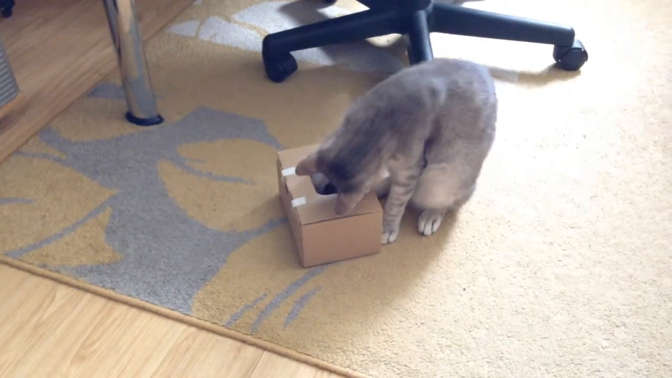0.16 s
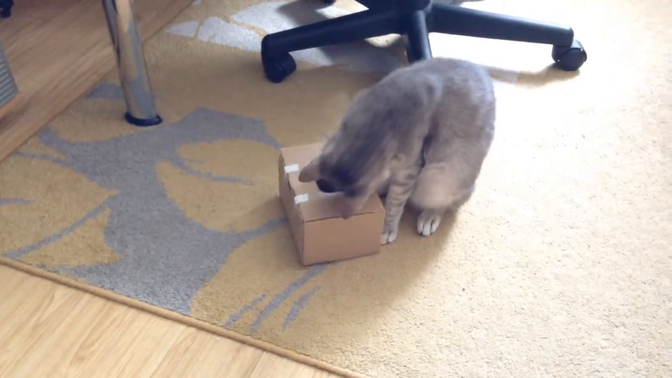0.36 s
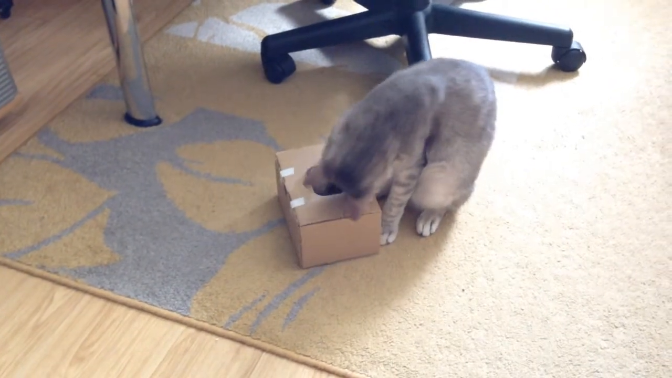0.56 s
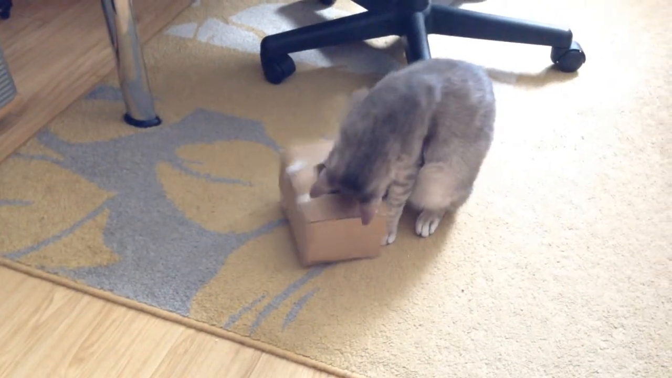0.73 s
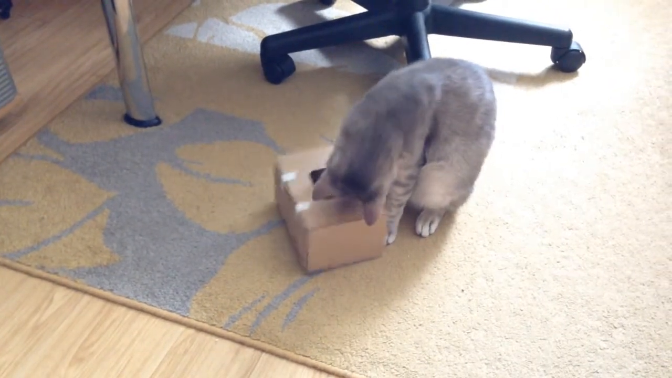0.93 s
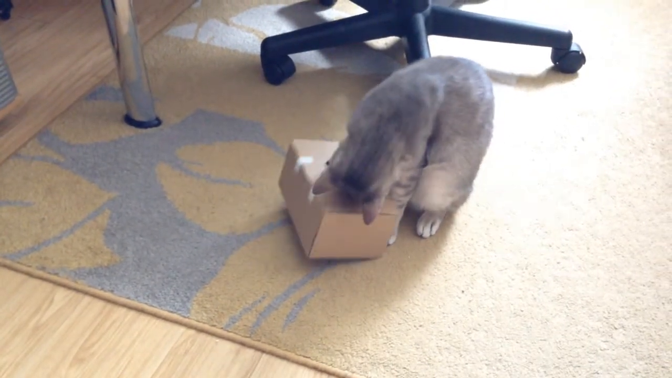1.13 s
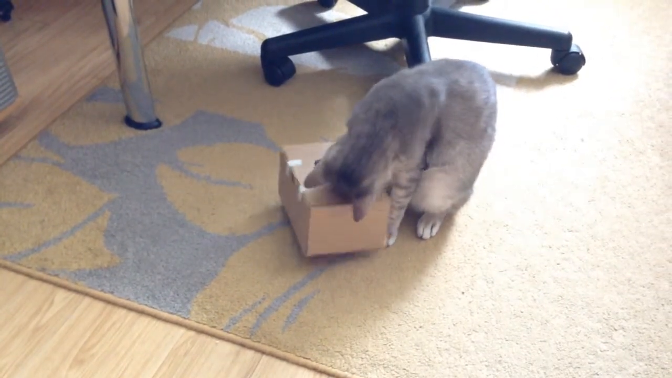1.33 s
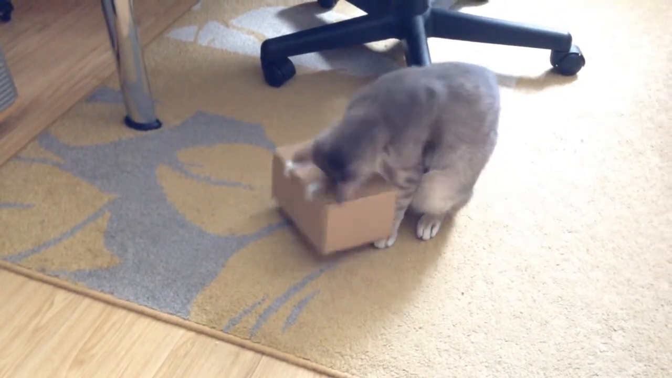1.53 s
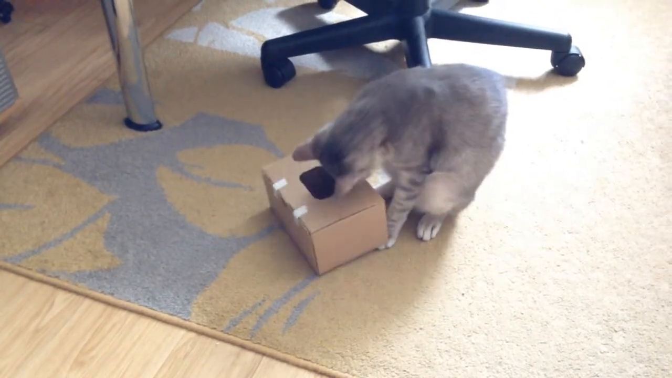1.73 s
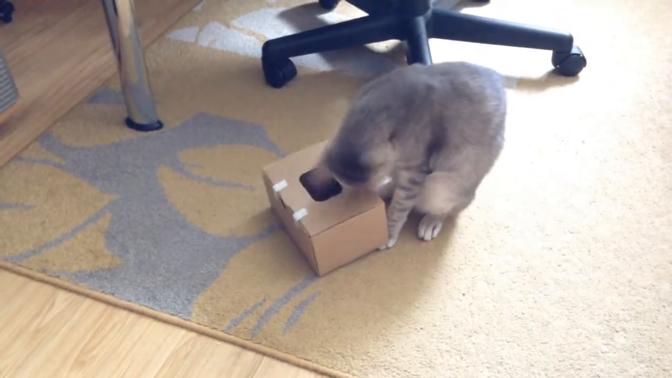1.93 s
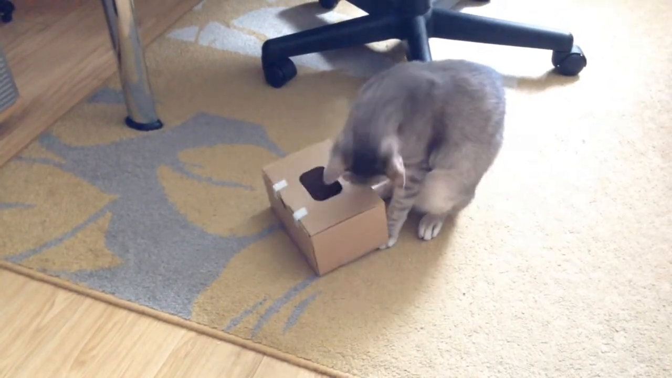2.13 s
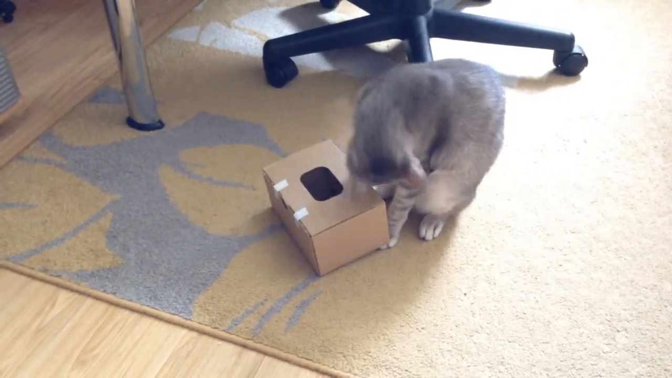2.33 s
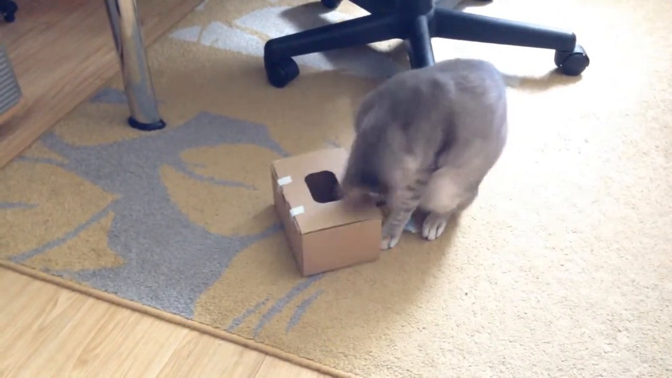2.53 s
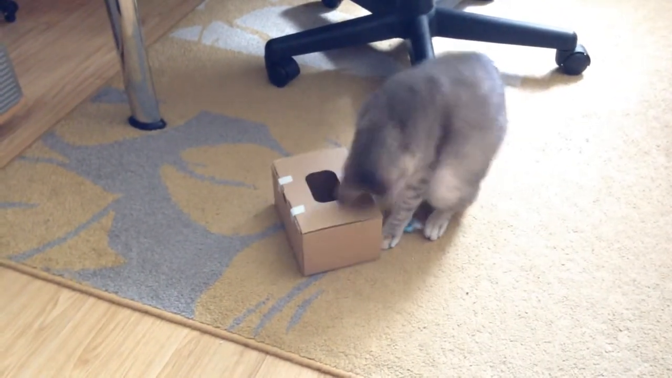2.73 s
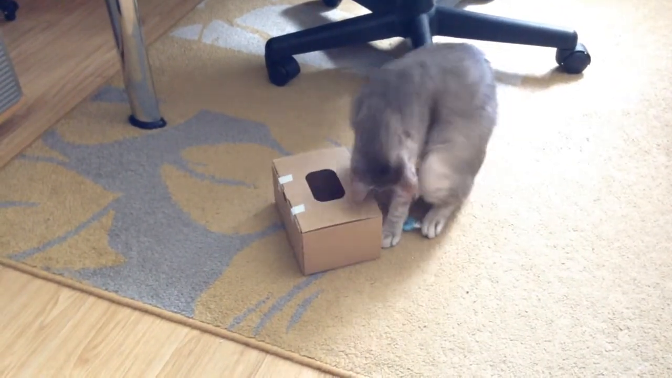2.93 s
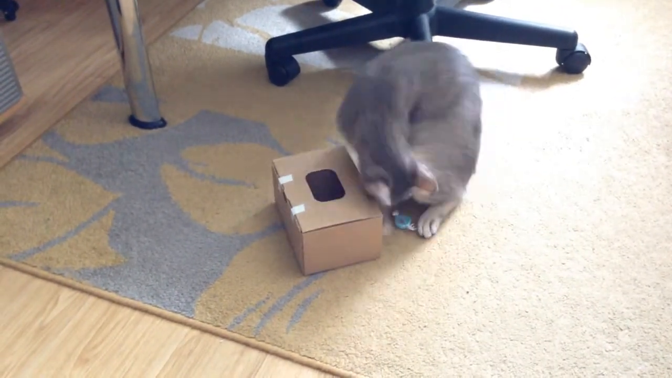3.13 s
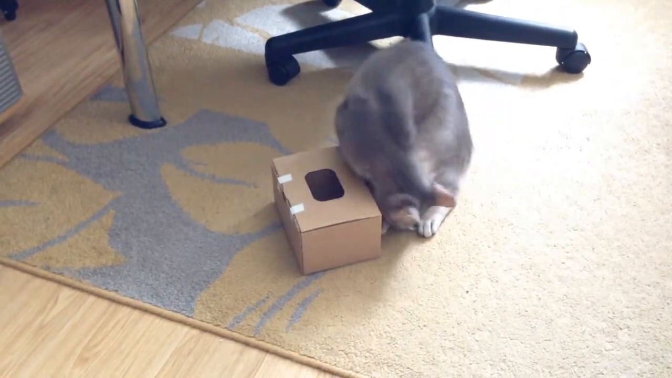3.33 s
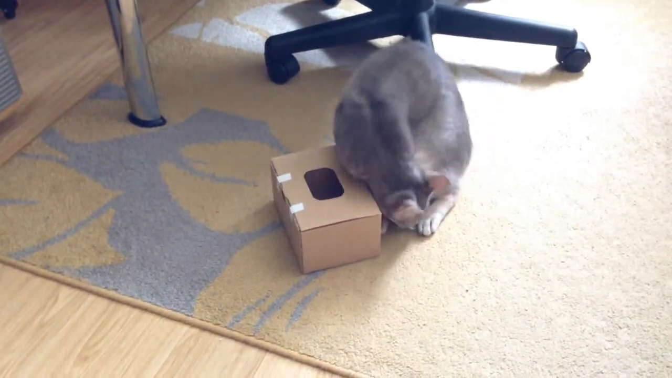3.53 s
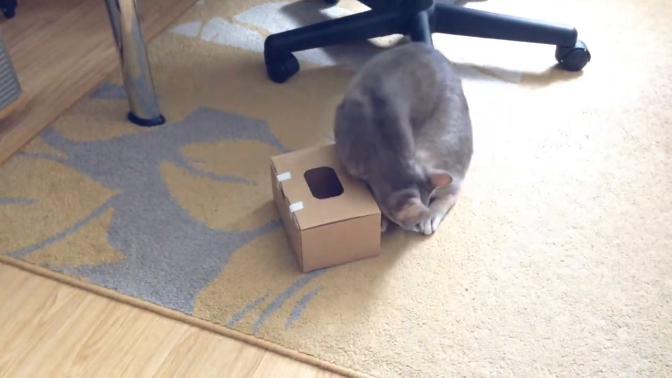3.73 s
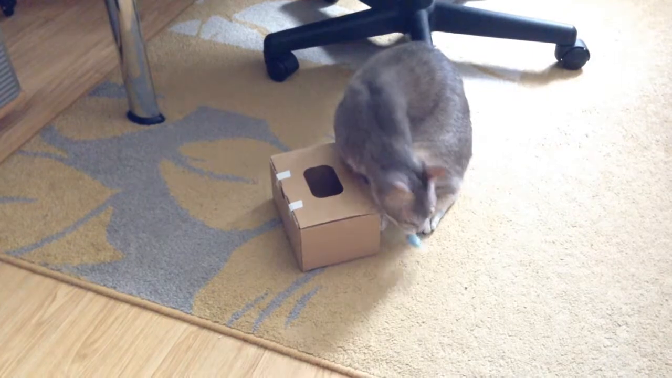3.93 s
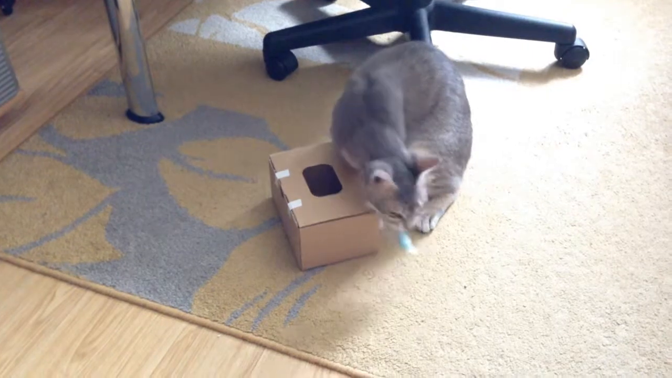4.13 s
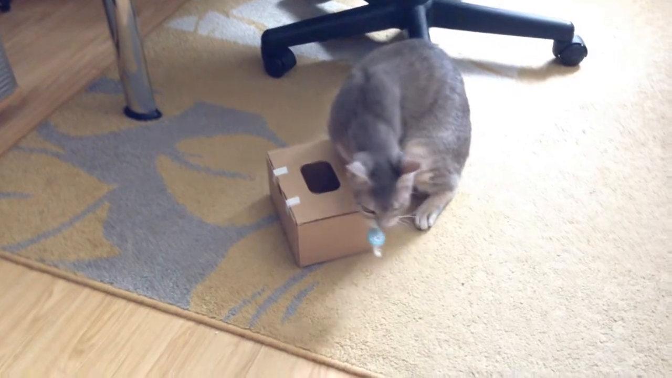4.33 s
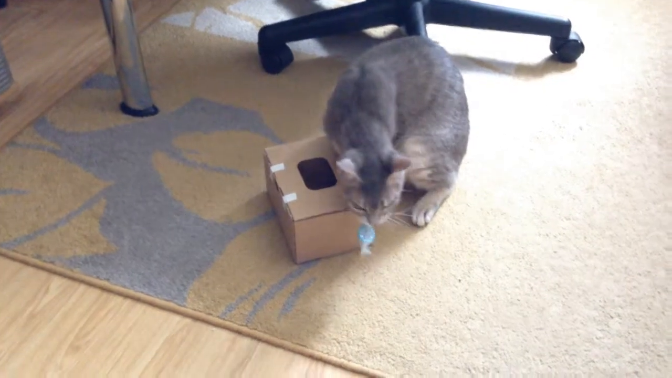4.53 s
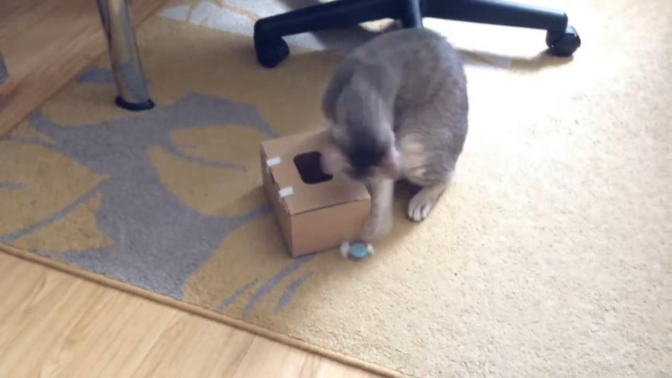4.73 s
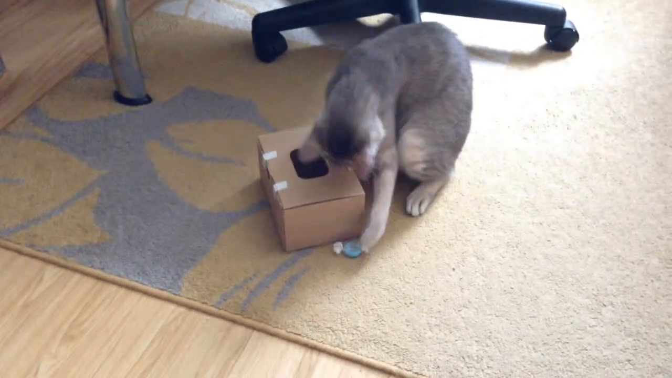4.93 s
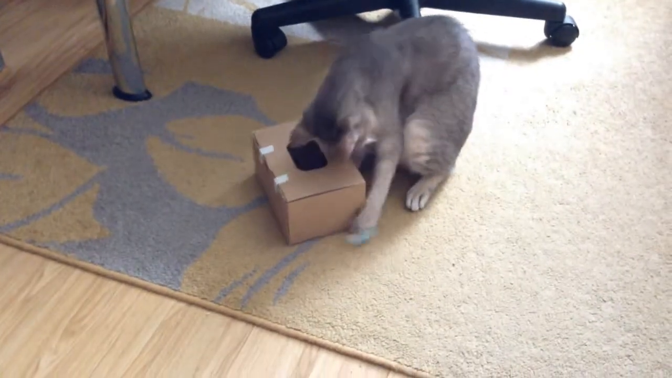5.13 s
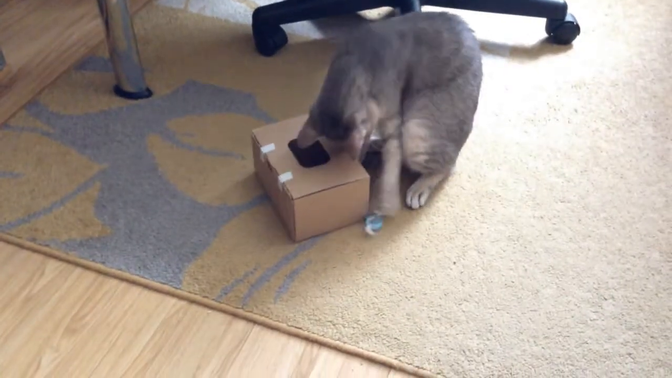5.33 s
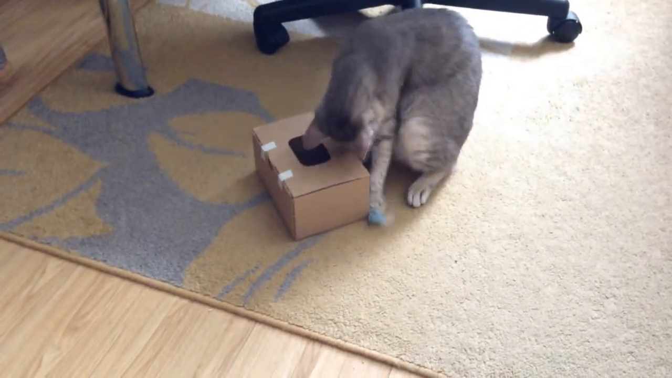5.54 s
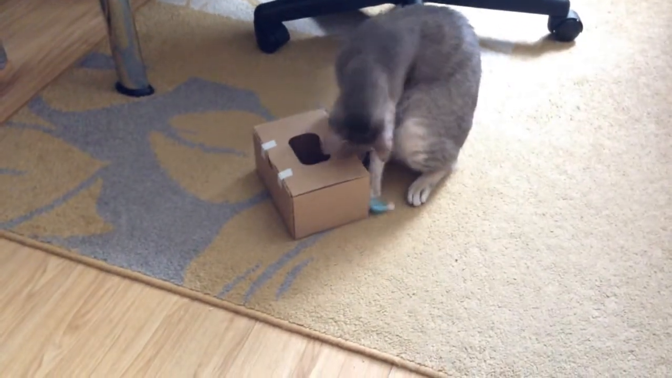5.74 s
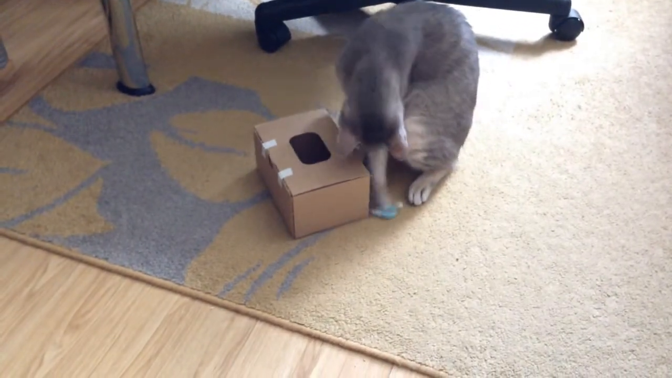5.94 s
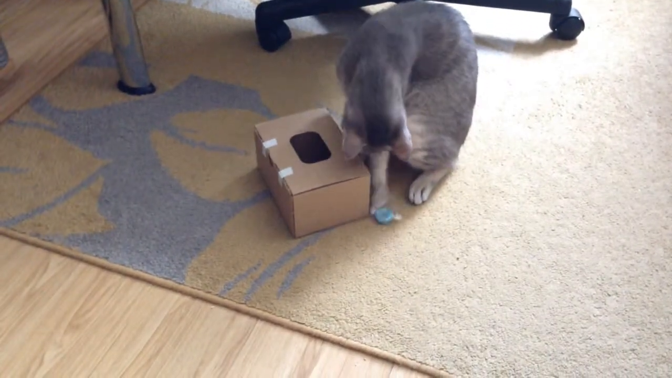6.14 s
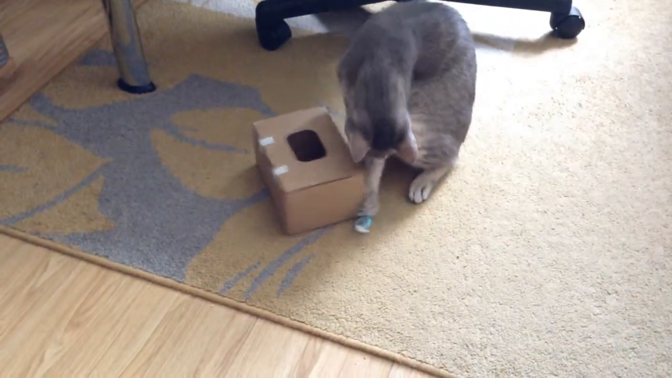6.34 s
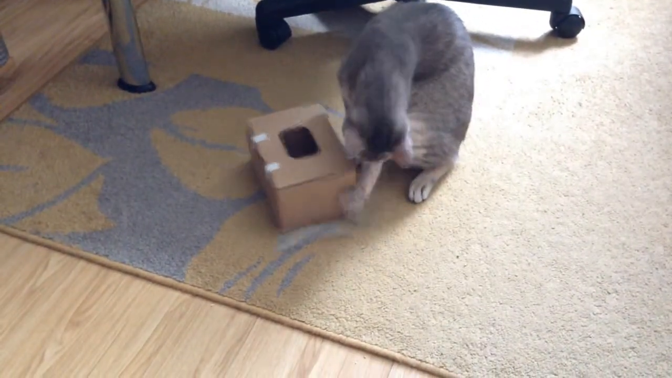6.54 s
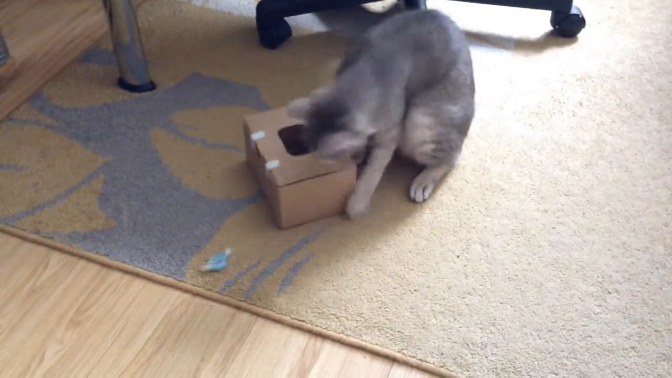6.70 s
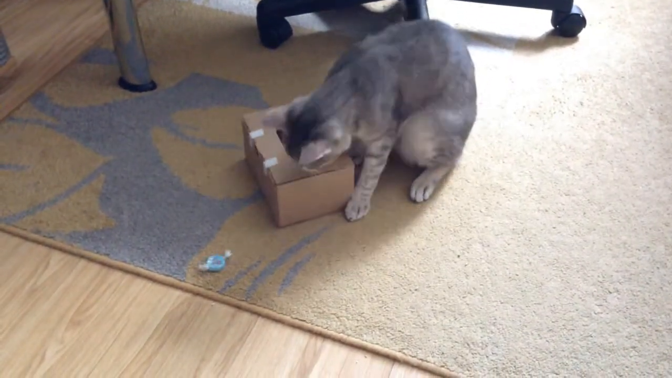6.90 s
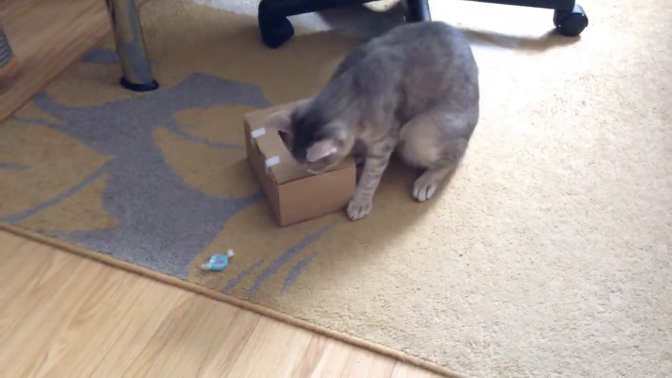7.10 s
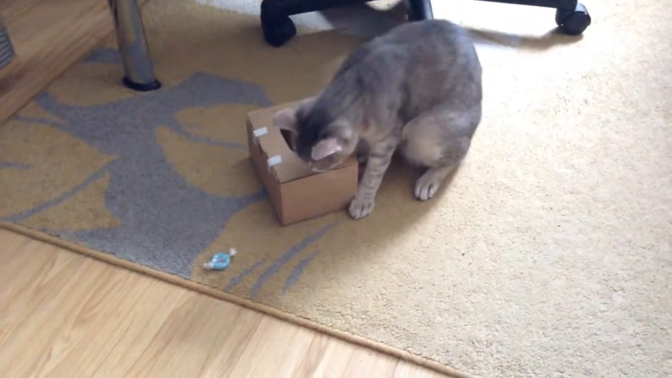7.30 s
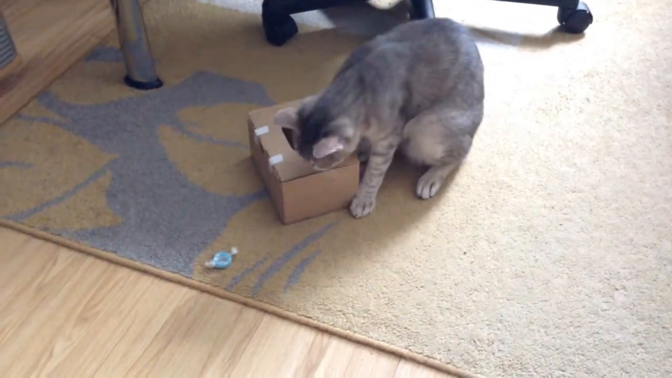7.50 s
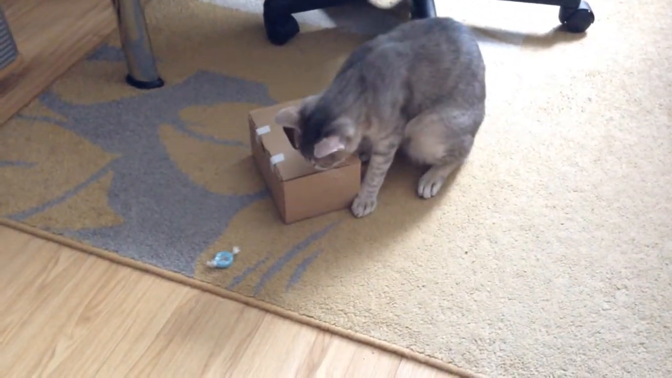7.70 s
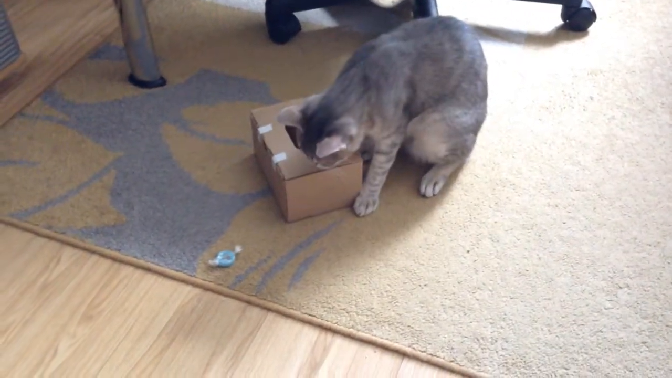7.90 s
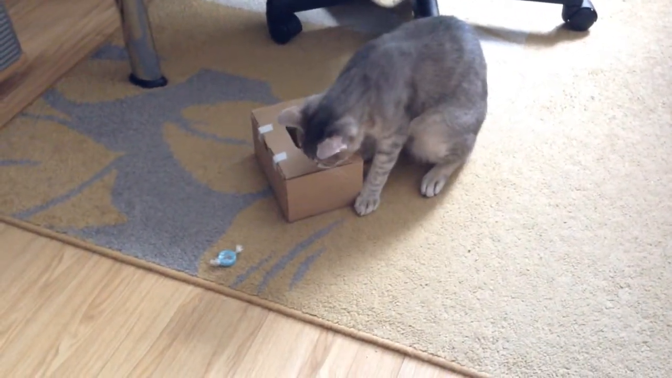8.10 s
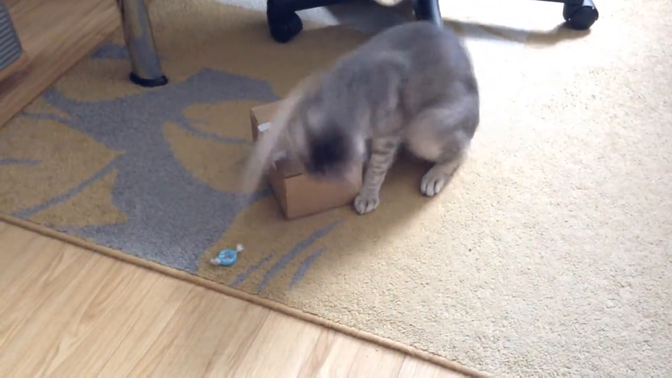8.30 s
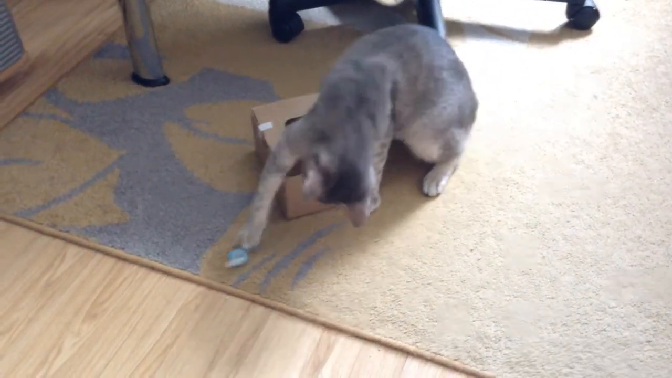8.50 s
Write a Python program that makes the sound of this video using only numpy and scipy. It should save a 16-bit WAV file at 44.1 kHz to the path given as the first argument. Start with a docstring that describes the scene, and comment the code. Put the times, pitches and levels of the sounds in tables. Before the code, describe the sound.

Cardboard knocks, slides and rasps under a cat's claws, followed by faint ticks and crinkles of a plastic wrapper in a quiet room.

```python
"""A faint fan hums in a small furnished room; the action is a metre or so away.
First a cat digs in a small cardboard box on a carpet: the box slides, knocks hollow and rocks,
claws rasp on its walls and paws thud softly. After two seconds the digging thins out.
Then the cat bats a wrapped sweet about: the film ticks and crinkles, claws catch, the sweet
bounces over the carpet, and after a pause one last swipe snaps the wrapper."""
import sys
import numpy as np
from scipy import signal
from scipy.fft import rfft, irfft, next_fast_len
from scipy.io import wavfile

SR = 44100
rng = np.random.default_rng(int(sys.argv[2]) if len(sys.argv) > 2 else 0)


def store_wav(level_fs):
    """Save 16-bit WAV to argv[1]."""
    pcm = np.round(np.clip(np.atleast_2d(level_fs), -1, 1) * 32767)
    wavfile.write(sys.argv[1], SR, pcm.T.astype(np.int16))


N = 381906
TIME = np.arange(N) / SR


def undb(db):
    """Decibels to gain."""
    return 10 ** (np.asarray(db) / 20)


def level(x, db):
    """Scale to an rms level."""
    return x * undb(db) / np.sqrt(np.mean(x ** 2) + 1e-20)


def peak(x, db):
    """Scale to a peak level."""
    return x * undb(db) / np.abs(x).max()


def add(track, s, sound):
    """Mix a sound into a track at s seconds."""
    i = max(int(s * SR), 0)
    track[i:i + len(sound)] += sound[:max(N - i, 0)]


def band(x, hz, width_hz):
    """Two-pole resonance with gain 1 at its centre."""
    damping = width_hz / hz
    warped_rate = .5 / np.tan(np.pi * hz / SR)
    return signal.lfilter(*signal.bilinear([damping, 0], [1, damping, 1], warped_rate), x)


def cut(x, hz, kind, order=2):
    """Low-pass or high-pass."""
    return signal.sosfilt(signal.butter(order, hz, kind, fs=SR, output="sos"), x)


def colour(x, points):
    """EQ a sound through (f/Hz, level/dB) points; rms 1."""
    hz, db = np.transpose(points)
    size = next_fast_len(len(x))
    f = np.maximum(np.fft.rfftfreq(size, 1 / SR), 1)
    eq = undb(np.interp(np.log(f), np.log(hz), db))
    return level(irfft(rfft(x, size) * eq, size)[:len(x)], 0)


def wander(hz):
    """Smooth random modulation below hz; rms 1."""
    return level(cut(rng.standard_normal(N), hz, "low"), 0)


def slips(per_s, spread_db, grip_db=2.5):
    """Stick-slip grains of uneven size; they bunch as the grip tightens and lets go."""
    grip = undb(grip_db * wander(hz=55))
    hit = rng.random(N) < grip * per_s / SR
    polarity = np.sign(rng.standard_normal(N))
    size = undb(spread_db * np.minimum(rng.exponential(size=N), 4))
    return hit * np.sqrt(grip) * polarity * size


def stroke(grains, s, length, bite_s, release_share=0.48):
    """The grains of one stroke: it bites quickly and eases off, with time to ring after."""
    start, n = int(s * SR), int(length * SR)
    t = TIME[:n]
    pressure = (1 - np.exp(-t / bite_s)) * np.minimum((1 - t / (n / SR)) / release_share, 1)
    pressed = np.take(grains, np.arange(start, start + n), mode="wrap") * pressure
    return np.pad(pressed, (0, SR // 100))


def room(x, wet_db, t60, build_s=0.0008):
    """Direct sound plus a short diffuse tail from walls and furniture."""
    t = TIME[:SR // 2]
    build_up = 1 - np.exp(-(t / build_s) ** 2)
    tail = rng.standard_normal(len(t)) * undb(-60 * t / t60) * build_up
    tail = cut(tail / np.sqrt(np.sum(tail ** 2)), 7000, "low", order=1)
    return x + undb(wet_db) * signal.fftconvolve(x, tail)[:N]


# room tone EQ: f/Hz, level/dB
ROOM_TONE_EQ = [(20, -53), (35, -12), (60, 0), (110, -2.5), (200, 0), (290, 1.5), (400, -5.5), (600, -5),
                (800, -7.5), (1200, -8), (2100, -10.5), (3000, -12.5), (8000, -16), (15000, -20)]
# the fan's tones: f/Hz, rms level/dB
FAN_TONES = [(252, -64.5), (317, -75.5), (432, -75), (755, -81), (806, -79.5), (2104, -79)]

def room_tone_and_fan():
    """The bed: even hiss and a steady fan whose tones waver very slightly."""
    out = colour(rng.standard_normal(N), ROOM_TONE_EQ) * undb(-62)
    for hz, db in FAN_TONES:
        swell = 1 + .1 * wander(hz=4)
        phase_drift = .25 * wander(hz=4)
        out += level(swell * np.sin(2 * np.pi * hz * TIME + phase_drift), db)
    return out


# the cat shoves the box along: t/s, length/s, rms level/dB of the drag's body
SHOVES = [(0, 0.11, -47.5), (0.262, 0.025, -47.5), (0.382, 0.08, -44), (.54, 0.1, -50.5),
          (0.695, 0.13, -42.5), (0.951, 0.13, -43.5), (1.224, 0.033, -50.5), (1.456, 0.22, -57),
          (1.608, 0.21, -46.5), (2.503, 0.1, -61.5), (2.609, 0.025, -52)]
# EQ of the drag's low body and of its surface hiss: f/Hz, level/dB
DRAG_BODY_EQ = [(30, -37), (130, -10), (205, 3), (275, -36), (360, 7), (500, 4), (730, 2), (1050, -2),
                (1600, -1.5), (1900, -6), (2600, -8), (5000, -50)]
DRAG_HISS_EQ = [(1000, -7), (2400, -2.5), (4000, 4.5), (5200, -1), (6600, -1), (9000, -7.5), (15000, -14.5)]

def box_drag(attack_s=0.0019, release_s=0.074, hiss_db=-54, at_body_db=-47.5, hiss_db_per_db=0.8):
    """The box drags in coarse slips while fur and fibres crackle on it; one effort drives both."""
    effort = np.zeros(N)
    for s, length, db in SHOVES:
        t = np.maximum(TIME - s, 0)
        take_hold = 1 - np.exp(-t / attack_s)
        slide_to_rest = np.exp(-np.maximum(t - length, 0) / release_s)
        effort = np.maximum(effort, undb(db) * take_hold * slide_to_rest)
    body = colour(slips(per_s=1200, spread_db=2.5), DRAG_BODY_EQ)
    hiss = colour(slips(per_s=2000, spread_db=4.5), DRAG_HISS_EQ)
    hiss_gain = undb(hiss_db) * (effort / undb(at_body_db)) ** hiss_db_per_db
    return effort * body + hiss_gain * hiss


# paws and the box's bottom land: t/s, peak level/dB
THUDS = [(.828, -38.5), (0.944, -42), (1.106, -29.5), (1.299, -40), (1.674, -36.5), (1.724, -31.5),
         (1.812, -38.5), (2.617, -39.5), (4.752, -39.5), (8.518, -50), (8.592, -50)]
# the batted sweet bounces: t/s, peak level/dB
SWEET_BOUNCES = [(6.425, -63), (6.536, -49), (6.66, -46), (6.72, -46.5)]

def carpet_thuds(thud_hz=186, bounce_hz=513, t60=0.025):
    """Paws, box and sweet land on carpet: each a few uneven low cycles."""
    t, out = TIME[:SR // 5], np.zeros(N)
    for landings, hz in (THUDS, thud_hz), (SWEET_BOUNCES, bounce_hz):
        for s, db in landings:
            push = rng.standard_normal(len(t)) * undb(-60 * t / t60)
            thump = band(push, hz, 0.29 * hz)
            add(out, s, peak(band(thump, hz, 2 * hz), db))
    return out


# claw strokes on box and carpet: t/s, length/s, rms level/dB, brightness f/Hz
CLAW_STROKES = [(0, 0.016, -45.5, 1790), (0.061, 0.11, -49, 5200), (0.353, 0.086, -44, 1480),
                (0.687, 0.028, -35.5, 1620), (0.813, 0.029, -45, 3300), (0.956, 0.026, -51.5, 1680),
                (0.98, 0.025, -42.5, 1100), (1.092, 0.018, -56, 3050), (1.245, 0.019, -43.5, 2150),
                (1.634, 0.024, -45.5, 3520), (1.804, 0.074, -57, 2500), (2.611, 0.046, -59, 1760),
                (3.136, 0.014, -52.5, 2080), (3.146, 0.033, -48.5, 2280), (3.724, 0.042, -65, 2450),
                (3.913, 0.0084, -61, 3430), (4.887, 0.0087, -53, 4120), (5.208, 0.05, -61.5, 3730),
                (5.258, 0.0075, -57, 3900), (5.324, 0.014, -59.5, 1600), (5.703, 0.17, -54.5, 2160),
                (5.885, 0.14, -60.5, 3420), (6.147, 0.0091, -57, 1590), (6.406, 0.006, -43, 2170),
                (6.412, 0.036, -52, 1530), (6.644, 0.066, -48, 2960), (6.817, 0.0083, -59, 4500),
                (8.517, 0.012, -54, 1710)]
# resonances of the rasp: f/Hz, width/Hz, level/dB
RASP_BANDS = [(830, 420, 20), (1274, 320, 12), (1600, 131, 17), (2310, 200, 7.5), (3180, 430, 12.5),
              (3900, 220, 5.5), (6300, 7100, -23)]

def claw_scrapes():
    """Claws skip over fibres and ring a few short resonances; longer strokes set in more gently."""
    out, grains = np.zeros(N), slips(per_s=3500, spread_db=3)
    for s, length, db, hz in CLAW_STROKES:
        drive = stroke(grains, s, length, bite_s=0.00086 + 0.044 * length)
        rasp = sum(undb(gain_db) * band(drive, centre, width) for centre, width, gain_db in RASP_BANDS)
        scrape = cut(band(rasp, hz, 1.03 * hz), 0.35 * hz, "high")
        tail_makeup = np.sqrt(len(scrape) / SR / length)
        add(out, s, level(scrape, db) * tail_makeup)
    return out


# the sharpest snaps of the wrapper's creases: t/s, peak level/dB, f/Hz
CREASE_SNAPS = [(0.178, -35, 4900), (2.806, -34, 6300), (3.879, -36, 5860), (4.164, -38, 9400),
                (4.291, -36.5, 6500), (4.3855, -40, 9800), (4.64, -35, 6300), (4.814, -27.5, 5670),
                (5.0935, -31.5, 9800), (5.159, -34, 7650), (5.5446, -33.5, 8750), (5.614, -28, 10400),
                (6.109, -37, 8930), (6.125, -34.5, 6900), (6.418, -22, 10500), (6.522, -40.5, 6700),
                (6.6059, -25.5, 7040), (8.507, -22.5, 11000), (8.6309, -35, 9000)]
# the wrapper crushed or brushed: t/s, length/s, rms level/dB
CRINKLES = [(1.624, 0.032, -53), (3.751, 0.2, -68.5), (4.78, 0.037, -61.5), (5.078, 0.077, -61),
            (5.226, .21, -72), (5.654, 0.29, -63), (6.039, 0.27, -67.5), (6.357, 0.029, -57.5),
            (6.49, 0.046, -62), (6.592, 0.016, -51), (6.673, 0.019, -48.5), (8.515, 0.03, -48.5),
            (8.625, 0.015, -52)]

def wrapper(crinkle_hz=7030, low_cut_hz=2700, snap_t60=0.0029, creak_db=-20, creak_s=0.002):
    """Thin plastic film: creases snap singly or in dense runs, with no bass."""
    t, out = TIME[:SR // 50], np.zeros(N)
    grains = slips(per_s=2200, spread_db=4.5)
    # tiny creases give way before and after a snap, as the film is loaded and relaxes
    creak_shape = np.exp(-np.concatenate([t[::-1], t]) / creak_s)
    for s, db, hz in CREASE_SNAPS + stray_snaps(crinkle_hz):
        snap = np.pad(rng.standard_normal(len(t)) * undb(-60 * t / snap_t60), (len(t), 0))
        creak = level(rng.choice(grains, len(snap)), creak_db) * creak_shape
        tick = cut(band(snap + creak, hz, 0.83 * hz), low_cut_hz, "high")
        add(out, s - t[-1], peak(tick, db))
    for s, length, db in CRINKLES:
        crush = stroke(grains, s, length, bite_s=0.0014)
        crinkle = cut(band(crush, crinkle_hz, width_hz=crinkle_hz), low_cut_hz, "high")
        tail_makeup = np.sqrt(len(crinkle) / SR / length)
        add(out, s, level(crinkle, db) * tail_makeup)
    return out


def stray_snaps(centre_hz, per_s=16, spread_db=13.5, relax_s=.07):
    """Cues for faint snaps at random moments while crushed film is worked and relaxes."""
    snaps = []
    for s, length, db in CRINKLES:
        span = length + relax_s
        typical_db = min(db + 23, -46)
        for when, size, pitch in rng.random((20, 3))[:round(per_s * span)]:
            snap_db = typical_db + spread_db * (2 * size - 1)
            snaps.append((s + when * span, snap_db, centre_hz * 2 ** (pitch - .5)))
    return snaps


def presence_colour(film):
    """Microphone and floor reflection add a small peak near 3.3 kHz; the very top is weak."""
    return cut(film + undb(5) * band(film, hz=3330, width_hz=420), 14200, "low")


# a hard shove tips the box: t/s, peak level/dB of the first landing, change per landing/dB
TIPS = [(0.456, -26.5, -19), (0.7045, -21, -3), (1.087, -27, -11)]

def box_rocking(first_gap_s=0.055, gap_ratio=.55, panel_hz=524, hard_db=-10.5, ring_db=-9.5):
    """Knock cues as the tipped box rocks to rest on its carpet-padded bottom, ever faster and weaker."""
    delays = np.cumsum(first_gap_s * gap_ratio ** np.arange(3))
    return [(s + delay, db + k * change_db, panel_hz, hard_db, ring_db)
            for s, db, change_db in TIPS for k, delay in enumerate(delays)]


# hits on the box: t/s, peak level/dB, panel f/Hz, contact hardness/dB, hollow ring/dB
KNOCKS = [(0.2532, -21.5, 510, -10, -39), (0.2608, -17.5, 597, -4.5, -12.5), (0.4357, -10, 710, -10.5, -11),
          (0.4611, -12, 785, -5.5, -4), (0.6772, -21.5, 1420, -5.5, -12), (0.7029, -8.5, 610, -13, -10),
          (0.7157, -15, 600, -11, -4.5), (.825, -26.5, 585, -2, 2), (1.05, -22, 606, -9, 0),
          (1.0996, -15.5, 547, 1, -5), (1.107, -14.5, 488, -3.5, -9), (1.298, -34, 580, 6, -1),
          (1.678, -35, 506, 0, 4), (1.7212, -21.5, 860, -7, -14), (1.7308, -27, 450, -6, -3),
          (2.616, -39.5, 420, -9, -2), (3.0426, -32.5, 600, -38.5, -5.5), (4.8044, -31, 627, -13, -11.5)]
# five short modes of the stiff folds, then the hollow's modes: f/Hz, level/dB, t60/s before the cap
BOX_MODES = [(1192, -2, 0.032), (1593, -1, 0.027), (2153, -8.5, 0.038), (3150, -33, 0.029),
             (3695, -8, .012), (194, -14, 0.37), (348, -12.5, 0.38), (484.7, -18.5, 0.3), (542, -8, 0.052),
             (560, -17.5, 0.27), (596, -12.5, 0.076), (672, -20.5, 0.31), (744, -12.5, 0.26),
             (786, -19.5, 0.81), (864, -5.5, 0.036), (919, -8.5, 0.15), (1014, -22, 0.27),
             (1245, -17, 0.47), (1226, -34, 0.46), (1306, -6, 0.081), (1450, -24, 0.31), (1610, -57, 0.099)]

def box_knocks(panel_t60=0.011, crack_t60=.04, t60_cap=.26, brush_s=.003, spot_db=2.5, detune=.025):
    """A blow flexes a panel, cracks the stiff folds and rings the hollow, less where the cat damps it."""
    t, out, lead = TIME[:SR // 4], np.zeros(N), SR // 100
    mode_hz, mode_db, t60 = np.transpose(BOX_MODES)[:, :, None]
    polarity = (-1) ** np.arange(len(BOX_MODES))[:, None]  # neighbouring modes move in opposite senses
    decays = polarity * undb(mode_db - 60 * t / np.minimum(t60, t60_cap))
    for s, db, panel_hz, hard_db, ring_db in KNOCKS + box_rocking():
        # each spot favours other modes; the cat's weight shifts their pitch a little
        spot, load = rng.uniform(-1, 1, (2, len(decays), 1))
        modes = decays * undb(spot_db * spot) * np.sin(2 * np.pi * mode_hz * (1 + detune * load) * t)
        folds, hollow = modes[:5].sum(0), modes[5:].sum(0)
        attack = 1 - np.exp(-2 * panel_hz * t)  # the panel takes about one swing to get going
        panel = attack * undb(-60 * t / panel_t60) * np.sin(2 * np.pi * panel_hz * t)
        burst = undb(-4 - 60 * t / crack_t60) * rng.standard_normal(len(t))
        crack = cut(burst, 2300, "low", order=1)
        direct = cut(panel + undb(hard_db) * (folds / 2 + crack), 220, "high")
        # the hollow answers most near the pitch of the struck panel
        ring = band(hollow, panel_hz, 0.29 * panel_hz) + undb(hard_db - 7) * hollow
        # the rough surfaces brush just before they meet
        brush = undb(-24) * np.exp(-t[lead:0:-1] / brush_s) * rng.standard_normal(lead)
        blow = np.concatenate([brush, direct + undb(ring_db) * ring])
        # a padded contact pushes for longer and loses the treble
        padded = cut(blow, 4400 * undb(.5 * hard_db), "low")
        add(out, s - lead / SR, peak(cut(padded, 270, "high"), db))
    return out


def scene():
    """The mono mix in the room; the box, close to the carpet, is the driest."""
    box = room(box_knocks(), wet_db=-11, t60=.26, build_s=.004)
    floor = room(box_drag() + carpet_thuds(), wet_db=-9, t60=.32)
    claws = room(claw_scrapes(), wet_db=-7, t60=.28, build_s=.003)
    sweet = room(presence_colour(wrapper()), wet_db=-4.5, t60=0.22)
    return (box + floor + claws + sweet + room_tone_and_fan())[None]


def record(dry):
    """The phone cuts the top steeply above 15.6 kHz."""
    return signal.sosfilt(signal.ellip(10, .2, 70, 15600, fs=SR, output="sos"), dry)


dry = scene()
out = record(dry)
store_wav(out)
```